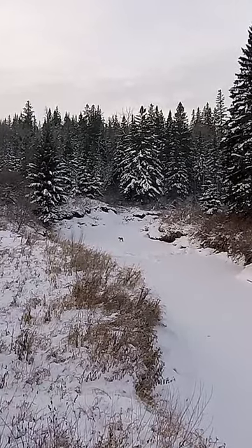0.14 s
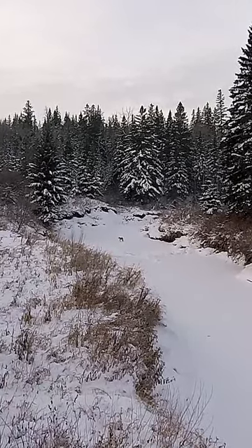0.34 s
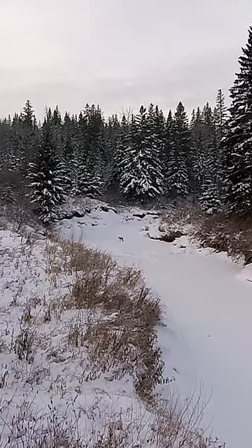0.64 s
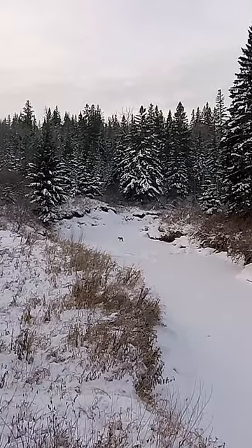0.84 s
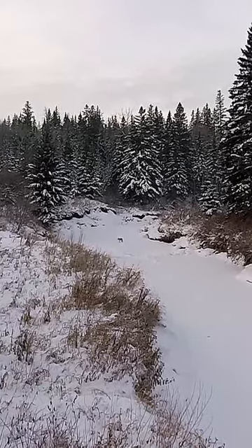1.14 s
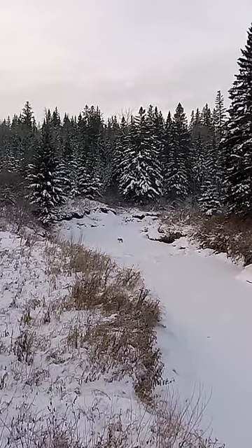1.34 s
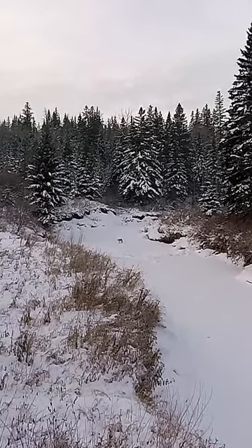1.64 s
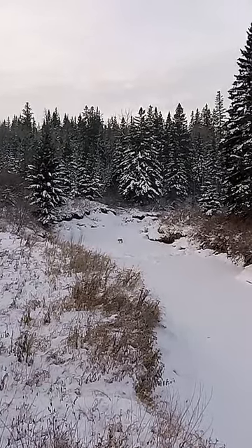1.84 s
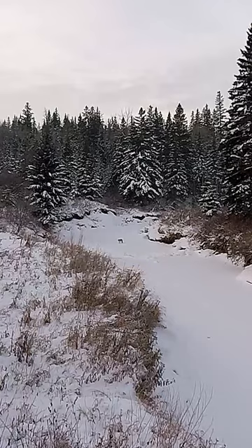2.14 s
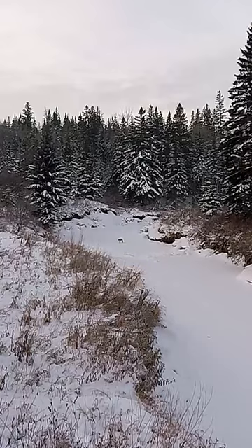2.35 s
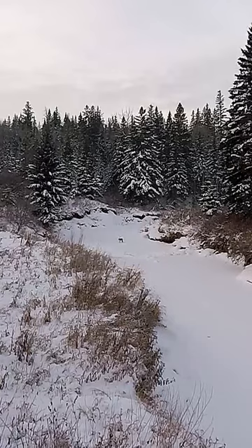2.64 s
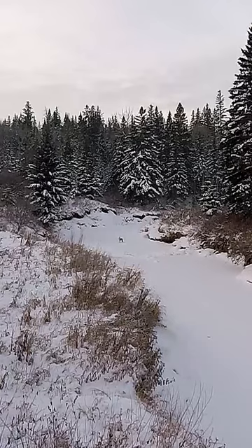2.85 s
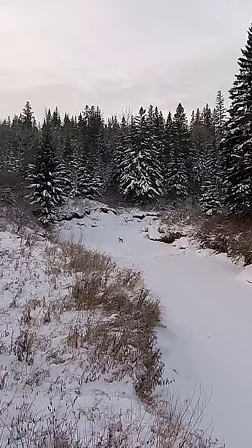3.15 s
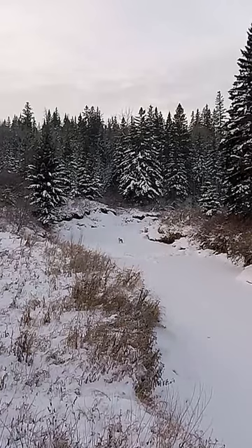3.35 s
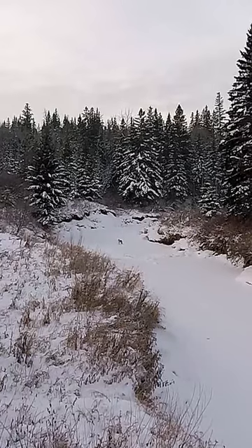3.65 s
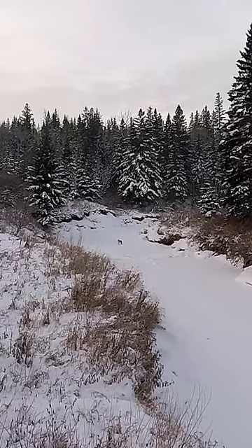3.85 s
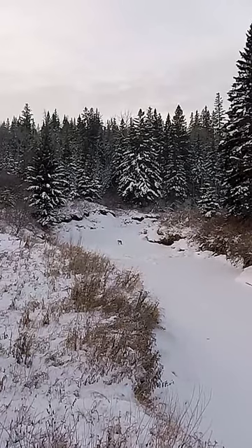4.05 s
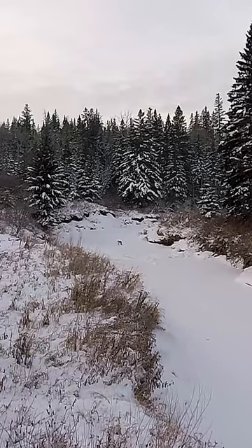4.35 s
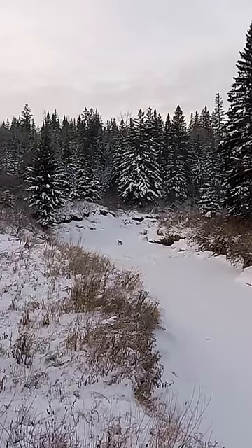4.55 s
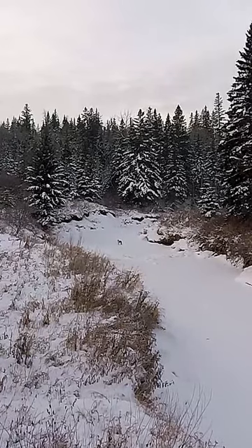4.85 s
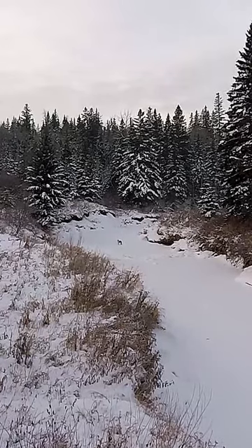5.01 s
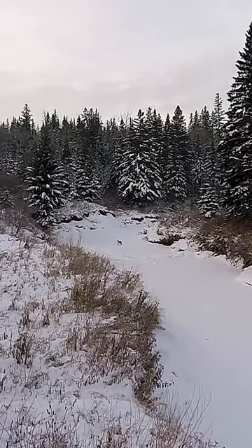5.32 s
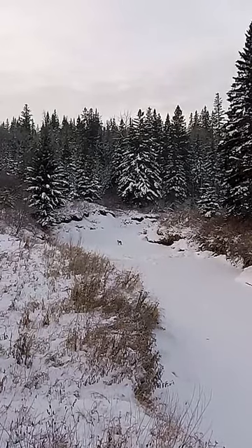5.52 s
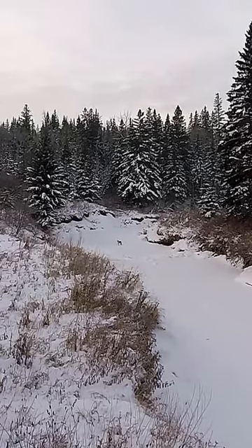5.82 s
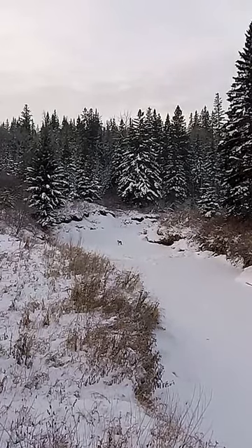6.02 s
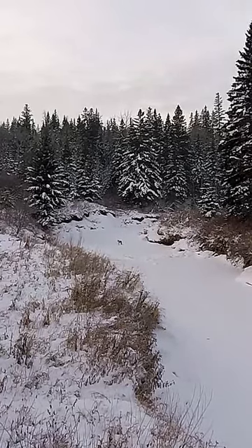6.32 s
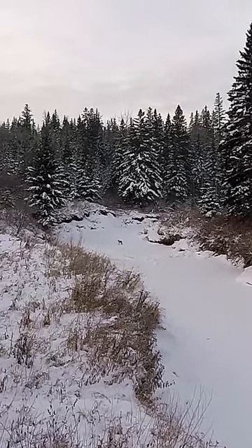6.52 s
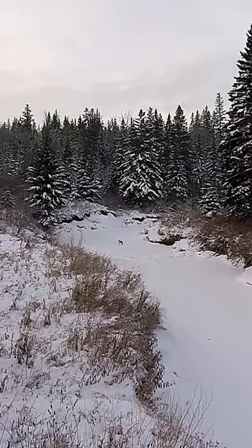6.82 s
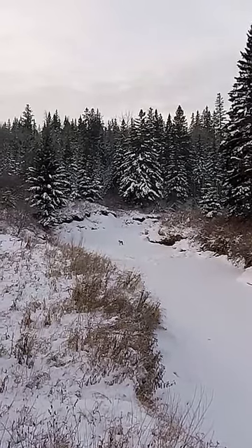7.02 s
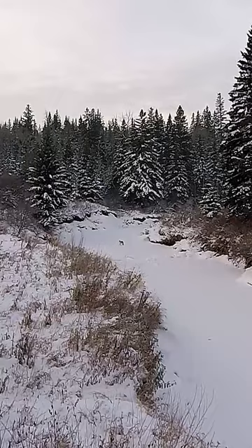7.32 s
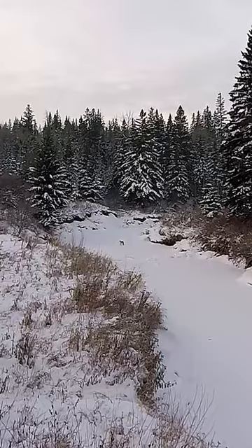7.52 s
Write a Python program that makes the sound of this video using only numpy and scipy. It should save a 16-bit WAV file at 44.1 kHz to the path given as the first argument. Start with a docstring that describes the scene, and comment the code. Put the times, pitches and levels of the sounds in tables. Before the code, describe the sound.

Hoarse coyote barks lead into quick upward yips and a brief howl, with faint forest echo, low rumble and tiny bird chips.

```python
"""A lone coyote on a frozen, snowy creek gives a soft woof, hoarse barks, five arching yips and a short howl, then barks again.
Its voice is a stack of gliding harmonics plus puffs of air. Every call but one thin whine is a single gesture:
the voice scoops up from a murmur, climbs to a crest, then cracks and falls away roughly.
The spruce forest answers faintly through a scatter of noise echoes; a small bird chips in one burst of gliding whistles.
Beneath lie a low distant rumble, a faint drone and a thin hiss, all of filtered noise."""
import sys
import numpy as np
from scipy import signal
from scipy.fft import rfft, irfft, next_fast_len
from scipy.io import wavfile
from scipy.ndimage import uniform_filter1d, map_coordinates

SR = 44100
rng = np.random.default_rng(int(sys.argv[2]) if len(sys.argv) > 2 else 0)


def unload_wav(signal):
    """Save mono or channel-first audio to the path in sys.argv[1] as 16-bit WAV at rate SR, clipped to [-1, 1]."""
    wavfile.write(
        sys.argv[1],
        SR,
        np.round(np.clip(np.atleast_2d(signal).T, -1, 1) * 32767).astype(np.int16),
    )


N = 338247

# High resonances of the mouth: freq_hz, weight (factor on a call's ring_db)
RING = [(4300, 0), (4950, 0.05), (5300, 0.52), (5800, 1.76), (6400, 1.3), (7400, 0), (8700, 1.57),
        (10000, 0)]


def amp(db):
    """Decibels to gain."""
    return 10 ** (np.asarray(db) / 20)


def unit(x):
    """Scale to rms 1."""
    return x / np.sqrt(np.mean(x ** 2) + 1e-20)


def blend(a, b, share):
    """From a to b as share goes from 0 to 1."""
    return a + (b - a) * share


def bump(t, centre, width):
    """A bell curve of height 1."""
    return np.exp(-((t - centre) / width) ** 2)


def along(points, hz):
    """A curve of (frequency, value) points, read on a log frequency axis."""
    point_hz, values = np.transpose(points)
    return np.interp(np.log(hz + 1), np.log(point_hz + 1), values)


def curves(rows, t):
    """Each column after the time, read at the times t."""
    time_s, *columns = np.transpose(rows)
    return [np.interp(t, time_s, column) for column in columns]


def wobble(rate_hz, t):
    """A smooth random curve through rate_hz random knots a second."""
    knots = rng.standard_normal(4096)
    return map_coordinates(knots, [(t - t[0]) * rate_hz], mode="wrap")


def filtered(x, response):
    """Shape the spectrum of x by a gain that depends on frequency."""
    size = next_fast_len(N + SR // 2)
    hz = np.fft.rfftfreq(size, 1 / SR)
    return irfft(rfft(x, size) * response(hz), size)[:N]


def noise(spectrum):
    """Coloured noise of rms 1."""
    return unit(filtered(rng.standard_normal(N), lambda hz: amp(along(spectrum, hz))))


def coyote():
    """All of the animal's calls, each with its own echo."""
    # Barks, the first a soft woof; harmonic levels are before the throat's gain:
    # start_s, rise_s, hold_s, start_hz, crest_hz, fundamental_db, second_harmonic_db, higher_harmonics_db,
    # roughness (0-1), crack_db, crack_roughness (0-1), period_doubling (0-1), ring_db, hoarse_air_db,
    # gape (factor on the throat's frequencies)
    barks = [(1.12, 0.025, 0.0088, 411, 442, -39, -45.5, -51.5, 0.48, -50, .55, 0, 0, -17, 0.9),
             (1.671, .036, 0.012, 458.8, 600, -25, -29.5, -29.5, 0.23, -26.5, .75, 0.07, -1, 1, 1.04),
             (2.342, 0.044, .017, 466, 676, -22, -26, -23, 0.13, -26.5, 0.8, 0.36, 1.5, 0, 1.013),
             (5.419, 0.037, 0.0072, 476, 555.4, -25.5, -28, -26.5, 0.12, -43, 0.6, 0, 10, -21, 0.93),
             (6.91, .031, 0.0136, 459.5, 598.7, -22.5, -26, -29.5, 0.42, -30, 0.6, .6, 1, 5, 0.93),
             (7.655, 0.039, .01, 462, 534, -30.5, -26.5, -23, 0.4, -30, .5, 0.2, 9.5, -3, 0.91)]
    # Yips, likewise: start_s, rise_s, hold_s, crest_hz, bow (shape of the climb, 1 = straight),
    # fundamental_db, second_harmonic_db, mid_climb_dip_db, higher_harmonics_db, crack_db,
    # crack_roughness (0-1), period_doubling (0-1), ring_db, hoarse_air_db, gape (factor)
    yips = [(2.694, 0.053, 0.0043, 668, 1.55, -22, -20.5, 30, -22.5, -18.5, 0.95, 0.29, 1.5, -9, 0.95),
            (2.96, 0.057, 0.005, 679.3, 2, -20, -18.5, 21.5, -20.5, -19, 0.55, 0.67, -9.5, -15, 0.88),
            (3.278, .064, 0.0035, 699.5, 1.66, -23.5, -21.5, 16.5, -32, -23, 0.32, 0, -5, -14.5, 0.91),
            (3.588, .048, .017, 714.3, 1.05, -21, -21, -0.5, -21.5, -23, 0.55, 0, 9.5, -12.5, 0.87),
            (3.989, .044, .021, 717, 0.79, -25, -23.5, 0.5, -26, -27.5, 0.35, 0, 10.5, -8, 0.91)]
    calls = [bark(*row) for row in barks] + [yip(*row) for row in yips]
    calls += [whine(), howl()]
    return sum(forest(one_call) for one_call in calls)


def bark(opens, rise, hold, start_hz, crest_hz, first_db, second_db, upper_db, rough,
         crack_db, crack_rough, doubling, *colour, bow=1.847, pressed_s=.03):
    """A short hoarse note that climbs fast and levels off; period doubling is strongest at the crest."""
    # How a bark begins and ends; triples are (fundamental, second harmonic, higher harmonics):
    # murmur_s, murmur_hz, murmur_db, murmur_rough (0-1), lead_s, attack_s triple, crack_tilt_db triple,
    # slack_hz, drop_s, release_db_per_s, tail_s
    bark_style = dict(murmur_s=.016, murmur_hz=385.9, murmur_db=-57, murmur_rough=0.44, lead_s=0.024, attack_s=(0.033, 0.037, 0.046),
                  crack_tilt_db=(-1.5, 1.5, -6),
                  slack_hz=408, drop_s=0.0208, release_db_per_s=602.5, tail_s=0.028)

    def held(t):
        pitch = climb(t, opens, rise, hold, start_hz, crest_hz, bow)
        return pitch, (first_db, second_db, upper_db), rough

    t, *voice = gesture(opens, opens + rise + hold, held, crack_db, crack_rough, **bark_style)
    doubled = doubling * bump(t, opens + rise, pressed_s)
    return call(t, *voice, doubled, *colour)


def yip(opens, rise, hold, crest_hz, bow, first_db, second_db, dip_db, upper_db,
        crack_db, crack_rough, doubling, *colour, start_hz=510, rough=.025, effort_db_per_hz=0.02,
        dip_at=.52, dip_width=.35, pressed_after_s=.018, pressed_s=.016):
    """A nearly pure climbing note, its second harmonic reshaped mid-climb; period doubling follows the crack."""
    # How a yip begins and ends; same fields and units as a bark's
    yip_style = dict(murmur_s=0.045, murmur_hz=330.5, murmur_db=-52, murmur_rough=.15, lead_s=.017, attack_s=(0.033, 0.024, 0.039),
                 crack_tilt_db=(-17.5, 2, -4),
                 slack_hz=275.4, drop_s=.021, release_db_per_s=369.5, tail_s=.08)
    breaks = opens + rise + hold

    def held(t):
        pitch = climb(t, opens, rise, hold, start_hz, crest_hz, bow)
        # A yip grows louder as it climbs.
        effort_db = effort_db_per_hz * (pitch - crest_hz)
        hollow_db = dip_db * bump((t - opens) / rise, dip_at, dip_width)
        levels_db = [db + effort_db for db in (first_db, second_db - hollow_db, upper_db)]
        return pitch, levels_db, rough

    t, *voice = gesture(opens, breaks, held, crack_db, crack_rough, **yip_style)
    doubled = doubling * bump(t, breaks + pressed_after_s, pressed_s)
    return call(t, *voice, doubled, *colour)


def howl(gain_db=4.5, upper_db=-3.6, rough=.012, crack_db=-20, crack_rough=0.2):
    """A long, wavering note; the higher harmonics follow the lowest two."""
    # The held note, levels before gain_db: time_s, pitch_hz, fundamental_db, second_harmonic_db
    held_note = [(4.265, 516, -40.5, -46), (4.297, 596, -31, -41), (4.335, 667, -34, -49),
                 (4.379, 679.5, -34, -39.5), (4.397, 702, -35, -39.5), (4.439, 787, -30, -28.5),
                 (4.465, 788, -25, -35.5), (4.511, 795.6, -31, -33), (4.535, 806, -26.5, -35),
                 (4.565, 828, -24.5, -33.5), (4.595, 847, -22.5, -40.5), (4.611, 847, -27, -35.5),
                 (4.631, 748.6, -38, -25.5), (4.679, 793, -28, -32.5), (4.713, 830, -22.5, -39),
                 (4.746, 825.5, -32.5, -28)]
    # How the howl begins and ends; same fields and units as a bark's
    howl_style = dict(murmur_s=.05, murmur_hz=338.4, murmur_db=-55.5, murmur_rough=.06, lead_s=.025, attack_s=(0.018, .015, 0.02),
                  crack_tilt_db=(-14.5, 1.5, -7.5),
                  slack_hz=279, drop_s=.028, release_db_per_s=424, tail_s=.055)

    def held(t):
        pitch, first_db, second_db = curves(held_note, t)
        higher_db = (first_db + second_db) / 2 + upper_db
        return pitch, gain_db + np.array([first_db, second_db, higher_db]), rough

    voice = gesture(held_note[0][0], held_note[-1][0], held, crack_db, crack_rough, **howl_style)
    return call(*voice, doubling=0, ring_db=7.5, hoarse_db=-18.5, gape=.95)


def whine(first_db=-50, second_db=-48, upper_db=-55):
    """A thin, quiet note through shut jaws between two yips, sinking a little."""
    # Pitch glide: time_s, pitch_hz
    glide = [(3.828, 360), (3.875, 357), (3.92, 338), (3.95, 335)]
    t = span(glide[0][0], glide[-1][0])
    pitch = curves(glide, t)[0]
    return call(t, pitch, (first_db, second_db, upper_db), rough=.03,
                doubling=0, ring_db=8, hoarse_db=-7, gape=0.83)


def span(start, end, fade=0.0089):
    """Sample times of a call, with room to fade in and out."""
    return np.arange(int((start - fade) * SR), int((end + fade) * SR)) / SR


def climb(t, opens, rise, hold, start_hz, crest_hz, bow, sag_hz_per_s=2574):
    """Pitch bends up to its crest, then sags until the voice cracks."""
    to_go = np.clip(1 - (t - opens) / rise, 0, 1)
    sag_hz = sag_hz_per_s * np.clip(t - opens - rise, 0, hold)
    return crest_hz - (crest_hz - start_hz) * to_go ** bow - sag_hz


def gesture(opens, breaks, held, crack_db, crack_rough, murmur_s, murmur_hz, murmur_db, murmur_rough,
            lead_s, attack_s, crack_tilt_db, slack_hz, drop_s, release_db_per_s, tail_s,
            scoop_s=.016, crack_s=0.0042, drop_bend=1.15, settle_s=0.076):
    """Times, pitch, levels and roughness: a murmur swells into the held note, which cracks, drops and dies."""
    t = span(opens - murmur_s, breaks + tail_s)
    pitch, levels_db, rough = held(t)
    early = np.maximum(opens - t, 0)
    late = np.maximum(t - breaks, 0)
    # Pitch scoops up from the murmur; drop_bend sets how roundly it tips over at the end.
    pitch = blend(murmur_hz, pitch, np.exp(-early / scoop_s))
    pitch = blend(slack_hz, pitch, np.exp(-(late / drop_s) ** drop_bend))
    swells = [np.clip((t - opens + lead_s) / s, 0, 1) for s in attack_s]
    cracked = 1 - np.exp(-(late / crack_s) ** 2)
    shaped_db = []
    for level_db, swell, tilt_db in zip(levels_db, swells, crack_tilt_db):
        swelling_db = blend(murmur_db, level_db, swell)
        dying_db = crack_db + tilt_db - release_db_per_s * late
        shaped_db.append(blend(swelling_db, dying_db, cracked))
    # The folds steady again after the crack.
    rough = blend(murmur_rough, rough, swells[-1])
    rough = blend(rough, crack_rough * np.exp(-late / settle_s), cracked)
    return t, pitch, shaped_db, rough


def call(t, pitch, levels_db, rough, doubling, ring_db, hoarse_db, gape, jitter=0.098, jitter_hz=500,
         rasp=1.0, rasp_hz=450, fade_s=0.012, pure_db=-11, shimmer_db=0.7763, shimmer_hz=38.4, count=14):
    """Harmonics of the vocal folds glide through the throat; roughness shakes their pitch and size."""
    # Air rushing through the folds: freq_hz, density_db (per Hz, relative)
    hoarse = [(200, -66.5), (600, 0.5), (1100, 5.5), (1450, 6), (1900, 7.5), (2300, 5), (2700, -25.5),
              (3600, -30.5), (4700, -43), (6000, -30), (9000, -35.5), (12000, -64.5)]
    first_db, second_db, upper_db = levels_db
    pitch = uniform_filter1d(pitch, SR // 200)
    rough = np.clip(rough, 0, 1)
    # The jaws close on low, smooth notes and stay open on harsh ones.
    shut = np.interp(pitch, [490, 590], [1, 0]) * (1 - rough) ** 2
    # An open, smooth voice has little beyond its third harmonic.
    pure = (1 - shut) * np.exp(-rough / 0.21)
    shaken_hz = pitch * (1 + jitter * rough * wobble(jitter_hz, t))
    phase = 2 * np.pi * np.cumsum(shaken_hz) / SR

    # Rough folds let a puff of air through once a cycle.
    puffs = (1 + np.cos(phase)) * rng.standard_normal(len(t))
    air = filtered(puffs, lambda hz: amp(along(hoarse, hz / gape) + ring_db * along(RING, hz)))[:len(t)]
    voice = amp(upper_db + hoarse_db) * rough * unit(air)

    for k in range(1, count + 1):
        level_db = first_db if k == 1 else second_db if k == 2 else upper_db
        level_db = level_db + (k > 3) * pure_db * pure
        # Moving air makes the higher harmonics come and go.
        level_db = level_db + shimmer_db * min(k - 1, 6) * wobble(shimmer_hz, t)
        # Chaotic folds smear each line into a band; the fundamental stays clearest.
        smear = rasp * rough * (.5 if k == 1 else 1)
        flicker = wobble(rasp_hz, t) + 1j * wobble(rasp_hz, t)
        band = (1 + smear * flicker) / np.sqrt(1 + 2 * smear ** 2)
        line = band * np.exp(1j * (k * phase + rng.uniform(0, np.pi)))
        voice += amp(level_db + mouth(k * pitch, gape, shut, ring_db)) * line.real
        # Period doubling puts a line halfway to the next harmonic.
        halfway = np.real(line * np.exp(1j * phase / 2))
        halfway_db = upper_db + mouth((k + .5) * pitch, gape, shut, ring_db)
        voice += doubling * amp(halfway_db) * halfway

    edges = np.clip(np.minimum(t - t[0], t[-1] - t) / fade_s, 0, 1)
    out = np.zeros(N + SR)
    out[round(t[0] * SR):][:len(t)] = np.sqrt(2) * voice * edges
    return out[:N]


def mouth(hz, gape, shut, ring_db, jaw_depth=1.25):
    """Gain in dB of throat and jaws, with resonances high up that ring_db raises or lowers."""
    # Throat and mouth heard from afar, before gape shifts them: freq_hz, gain_db
    throat = [(250, -28.5), (400, -28), (520, -3), (2050, -4.5), (2350, -13), (2700, -26.5), (3600, -44.5),
              (4600, -49.5), (5900, -49.5), (7200, -57), (9000, -51), (11000, -55)]
    # Resonances of nearly shut jaws at low pitch, before jaw_depth: freq_hz, gain_db
    shut_jaws = [(450, 0), (740, -5), (1080, 7), (1420, -9), (1880, 6), (2200, -9), (3000, -2)]
    return along(throat, hz / gape) + jaw_depth * shut * along(shut_jaws, hz) + ring_db * along(RING, hz)


def forest(x, bank_db=-20, bank_t60=0.11, bank_delay=.018, trees_db=-16.5, trees_delay=0.03):
    """The direct sound, scatter from the creek banks and a faint tail from the trees, as decaying noise."""
    # Decay of the trees' tail: freq_hz, t60_s
    tree_decay = [(300, 0.89), (750, 1.115), (1300, 0.48), (2000, 0.45), (3000, 0.34), (6000, 0.89)]
    hz, t, z = signal.stft(rng.standard_normal(SR), SR, nperseg=256)
    decay = amp(-60 * t / along(tree_decay, hz)[:, None])
    # The trees fade in from half of trees_delay to one and a half times it.
    onset = np.clip(t / trees_delay - .5, 0, 1)
    trees = signal.istft(z * decay * onset, SR, nperseg=256)[1]
    t = np.arange(len(trees)) / SR
    banks = rng.standard_normal(len(t)) * amp(-60 * t / bank_t60) * (t > bank_delay)
    answer = amp(bank_db) * banks / np.linalg.norm(banks)
    answer += amp(trees_db) * trees / np.linalg.norm(trees)
    return x + signal.oaconvolve(x, answer)[:N]


def bird(waver=0.033, waver_hz=410):
    """Tiny sine whistles that glide and waver in pitch, each under a half-sine swell."""
    # Chips: start_s, length_s, start_hz, end_hz, level_db
    chips = [(5.724, 0.1, 5700, 5440, -68), (5.794, 0.054, 2980, 3300, -60),
             (5.843, 0.022, 5250, 5630, -63.5), (5.934, 0.013, 5850, 5250, -59),
             (5.946, 0.028, 5430, 5250, -68), (6.005, 0.0055, 4950, 5750, -53)]
    out = np.zeros(N)
    for start, length, from_hz, to_hz, db in chips:
        t = np.arange(int(length * SR)) / SR
        hz = np.linspace(from_hz, to_hz, len(t)) * (1 + waver * wobble(waver_hz, t))
        whistle = np.sin(2 * np.pi * np.cumsum(hz) / SR)
        swell = np.sin(np.pi * t / length)
        out[int(start * SR):][:len(t)] += amp(db) * np.sqrt(2) * swell * whistle
    return out


def background(rumble_db=1.5, hiss_db=-69.5, flutter_db=1.0, flutter_hz=11, drone_hz=378, drone_width_hz=22):
    """Filtered noise: a low far rumble that swells a little, a faint drone and a steady hiss."""
    # Colours of rumble and hiss: freq_hz, density_db (per Hz, relative)
    rumble_colour = [(25, -33), (105, -34), (120, -28), (137, -5.5), (158, 0), (200, -4.5), (260, -8),
                     (400, -11.5), (630, -16.5), (1000, -25.5), (2000, -34), (3000, -41.5), (4300, -59.5),
                     (7000, -61)]
    hiss_colour = [(3000, -3), (4500, -13), (5800, -6), (6500, 2), (8500, 1), (11000, -5), (15000, -14.5)]
    # Swell of the rumble, before rumble_db and flutter: time_s, level_db
    rumble_swell = [(0.0, -52), (2.26, -51.5), (2.88, -49), (4.09, -51), (7.37, -51.5), (7.6, -51.5)]
    # Level of the far drone: time_s, level_db
    drone_level = [(0, -58.5), (.4, -69), (.52, -48), (.8, -60.5), (1.0, -57.5), (1.2, -56), (1.4, -69),
                   (7.67, -73)]
    t = np.arange(N) / SR
    swell_db = curves(rumble_swell, t)[0] + rumble_db + flutter_db * wobble(flutter_hz, t)
    rumble = amp(swell_db) * noise(rumble_colour)
    drone = unit(filtered(rng.standard_normal(N), lambda hz: bump(hz, drone_hz, drone_width_hz)))
    drone = amp(curves(drone_level, t)[0]) * drone
    hiss = amp(hiss_db) * noise(hiss_colour)
    return rumble + drone + hiss


def scene():
    """The animals, their echo and the winter air."""
    return (coyote() + forest(bird()) + background())[None]


def record(dry, top_hz=15300, fade_s=0.0037):
    """A steep low-pass limits the band, and the sound fades out softly at the very end."""
    low_pass = signal.ellip(10, .1, 70, top_hz, fs=SR, output="sos")
    out = signal.sosfilt(low_pass, dry)
    left = np.minimum(np.arange(N)[::-1] / (fade_s * SR), 1)
    return out * np.sin(np.pi / 2 * left) ** 2


dry = scene()
out = record(dry)
unload_wav(out)
```